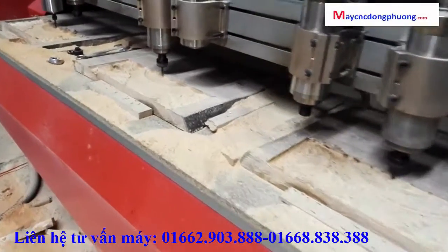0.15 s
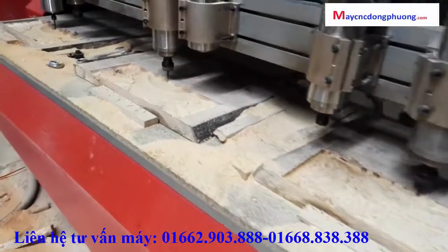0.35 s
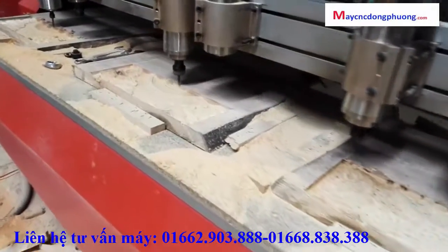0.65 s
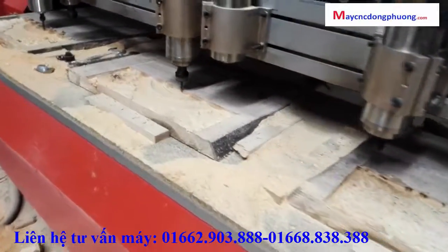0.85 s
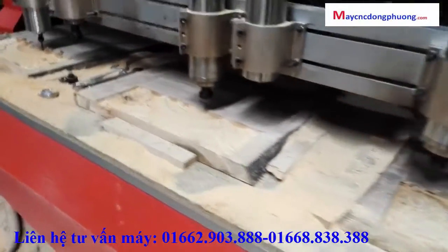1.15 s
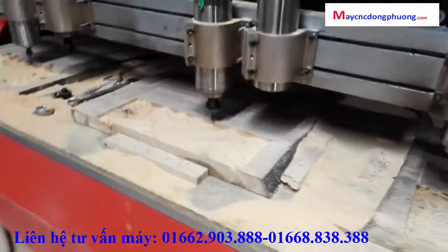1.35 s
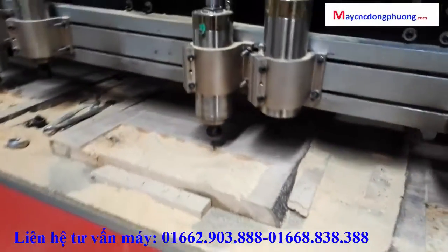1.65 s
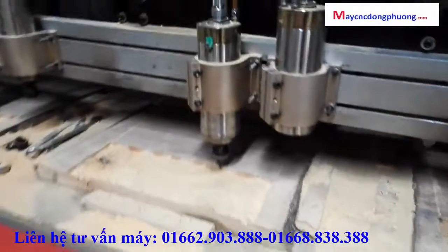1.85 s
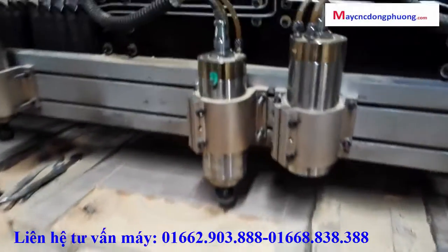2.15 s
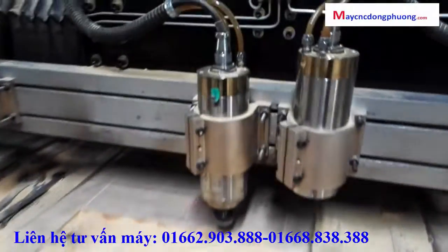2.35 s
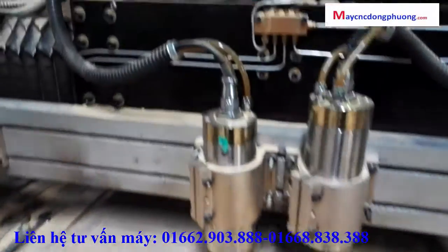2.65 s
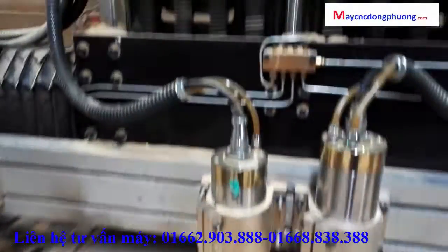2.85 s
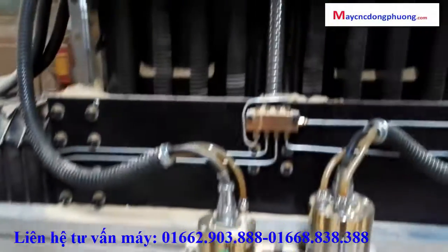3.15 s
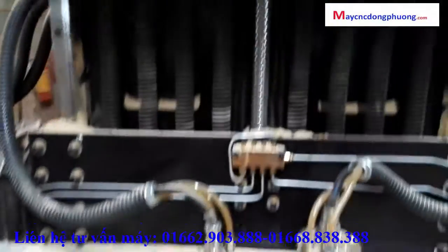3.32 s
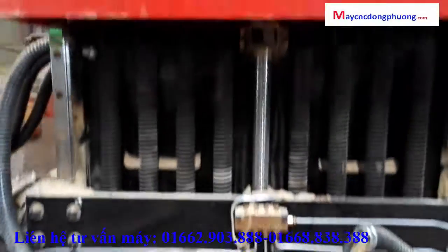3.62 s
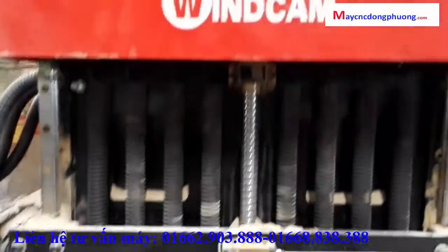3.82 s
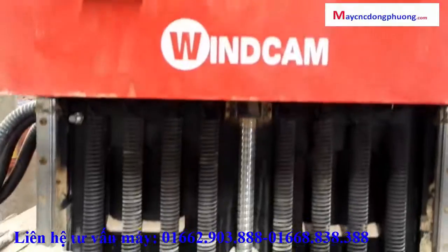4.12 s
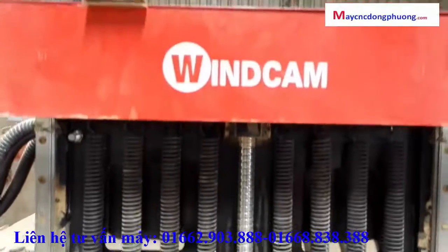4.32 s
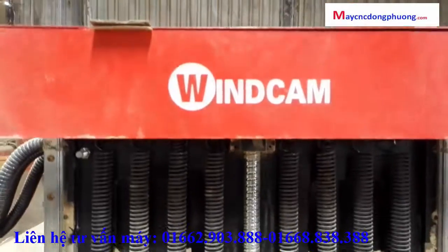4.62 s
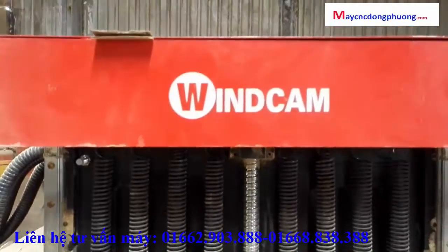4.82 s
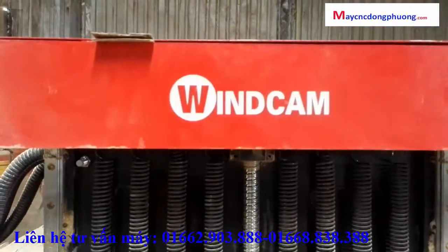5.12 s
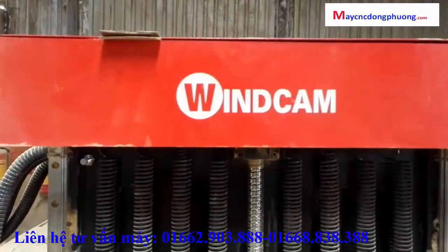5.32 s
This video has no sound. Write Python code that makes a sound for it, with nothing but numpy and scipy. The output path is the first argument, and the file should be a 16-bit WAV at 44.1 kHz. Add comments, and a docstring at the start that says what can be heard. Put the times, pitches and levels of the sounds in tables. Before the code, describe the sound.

A multi-spindle router is already cutting wood at 0 seconds, heard loud and close in a workshop, and runs throughout without stopping. Fast spindles give a hard, nearly steady whine with many buzzing overtones; a slower one hums about a whole tone below. The bits work in short strokes: each brings a swell of woody roar, dry rasp and hissing chips, and the pitch sags very slightly under load. After an early cut, it lightens around 0.3-0.75, bites harder at 0.8-1.25, then strongly at 1.4-2.05. Lighter cutting follows until about 2.9, while the microphone rises from bed to gantry from 2.2 to 2.9, slightly dulling the spray and changing the overtone balance. Another heavy stroke comes at 3.2-3.9, moderate ones from 3.9 to 4.7, and a firmer cut from 5.0 to the abrupt end near 5.5. Overtones ring out and shift sideways; thin high whistles and low frame rumble stay faint.

```python
"""In a workshop a multi-spindle CNC router carves wood, heard from close by as the listener rises from bed to gantry.
The bits cut in short strokes: load makes the spindles (near 24000 rpm) sag and buzz, and the wood rasp and spray chips.
The spindles are sums of sine orders that ring out at set times; the cut is coloured noise, combed by bounces.
A slower spindle hums about a whole tone below, the frame rumbles (noise) and thin whistles (sines) sit on top."""
import sys
import numpy as np
from scipy import signal
from scipy.fft import rfft, irfft, next_fast_len
from scipy.io import wavfile

SR = 44100
rng = np.random.default_rng(int(sys.argv[2]) if len(sys.argv) > 2 else 0)


def master(y):
    """Save y as 16-bit WAV."""
    cut = np.clip(np.atleast_2d(y).T, -1, 1)
    pcm = np.round(cut * 32767)  # scale
    wavfile.write(sys.argv[1], SR, pcm.astype(np.int16))


N = 241315


def from_db(db):
    """Decibels to gain."""
    return 10 ** (np.asarray(db) / 20)


def rms_one(x):
    """Scale to unit power."""
    return x / np.sqrt(np.mean(x ** 2) + 1e-20)


def in_time(rows):
    """Straight lines through (time, value) rows, a value for every sample."""
    time_s, value = np.transpose(rows)
    return np.interp(np.arange(N) / SR, time_s, value)


def drift(rate_hz):
    """Slow random curve of spread 1: white noise through a two-pole low-pass, drawn at every 40th sample."""
    step, warm_up = 40, 2000
    r = np.exp(-2 * np.pi * rate_hz * step / SR)
    white = rng.standard_normal(N // step + 2 + warm_up)
    slow = signal.lfilter([1], [1, -2 * r, r * r], white)[warm_up:]
    return np.interp(np.arange(N) / step, np.arange(len(slow)), rms_one(slow))


def pan(lean_db):
    """Left and right gains at constant power; positive leans left."""
    gains = from_db(np.array([[.5], [-.5]]) * lean_db)
    return gains / np.sqrt(np.mean(gains ** 2, axis=0))


def noise(spectrum, alike):
    """Stereo noise of a given colour and left-right correlation; rms 1."""
    size = next_fast_len(N)
    hz, level_db = np.transpose(spectrum)
    bins_hz = np.maximum(np.arange(size // 2 + 1) * SR / size, 1)
    gain = from_db(np.interp(np.log(bins_hz), np.log(hz), level_db, left=-60, right=-60))
    white = rng.standard_normal((2, size))
    mid, side = irfft(rfft(white) * gain, size)[:, :N]
    return rms_one(np.sqrt(1 + alike) * mid + np.sqrt(1 - alike) * side * [[1], [-1]])


def shaft_angle(hz, jitter_hz):
    """Angle in radians of a rotation whose speed trembles."""
    return 2 * np.pi * np.cumsum(hz + jitter_hz * drift(21.04)) / SR


def tone(angle, lead_rad, lean_db):
    """A sine partial of rms 1 that reaches the two ears with its own lead and lean."""
    ear_phase = np.array([[.5], [-.5]]) * lead_rad
    return np.sqrt(2) * pan(lean_db) * np.sin(angle + rng.uniform(0, 2 * np.pi) + ear_phase)


def scattered(angle, rate_hz):
    """A partial arriving by many changing paths: it fades and beats on its own in each ear; rms near 1."""
    sine, cosine = np.sin(angle), np.cos(angle)
    return np.array([drift(rate_hz) * sine + drift(rate_hz) * cosine for ear in range(2)])


def beating(depth):
    """Gain of a line that two spindles at nearly the same speed share; expected power 1."""
    phase = 2.94 * drift(3.17) + rng.uniform(0, 2 * np.pi)
    return np.sqrt(1 + 2 * depth / (1 + depth ** 2) * np.cos(phase))


def swell(start_s, length_s, attack_s, release_s, shallow):
    """Envelope that sets in, arches to its top midway and lets go; shallow is the share lost at the ends."""
    since_s = np.arange(N) / SR - start_s
    gate = np.clip(np.minimum(since_s / attack_s, 1 + (length_s - since_s) / release_s), 0, 1)
    return gate * (1 - shallow * np.clip(2 * since_s / length_s - 1, -1, 1) ** 2)


def follow(law, load_db, height):
    """Level in dB of a sound that follows the load and changes as the listener rises."""
    level_db, per_load, gantry_db = law
    return level_db + per_load * load_db + gantry_db * height


def cutting_load():
    """Load on the bits in dB: each stroke climbs from idle, deepest midway; hard and soft grain makes it waver."""
    # bit strokes through the wood: (start [s], length [s], load [dB re an average cut])
    strokes = [(-0.18, 0.5, 4), (0.288, 0.85, -4.5), (0.78, 0.48, 5), (1.377, 0.69, 6.5),
               (2.023, 0.37, -0.1), (2.27, 0.84, -3.5), (2.873, 0.33, 1.4), (3.163, 0.74, 6.5),
               (3.84, 0.28, 0.9), (4.096, 0.62, 0.9), (4.606, 0.12, -3.2), (4.742, 0.66, 0.06),
               (5.037, 0.47, 4)]
    idle_db, grain_db = -7.5, 0.42
    depths_db = [(db - idle_db) * swell(start_s, length_s, attack_s=.07, release_s=.027, shallow=.607)
                 for start_s, length_s, db in strokes]
    return idle_db + np.max(depths_db, axis=0) + grain_db * drift(9)


def shaft_hum(angle):
    """The fast shafts hum once a turn."""
    # fundamental of the fast spindles: (time [s], level [dB])
    hum = [(0.0, -28.5), (0.55, -33.5), (0.62, -46.5), (1.05, -31), (1.1, -39.5), (1.69, -20),
           (2.06, -28.5), (3.41, -27), (3.5, -41), (3.56, -29), (3.75, -21.5), (4.21, -38.5), (4.3, -29),
           (5.15, -30), (5.3, -46), (5.47, -28.5)]
    level_db = in_time(hum) + drift(17)
    return from_db(level_db) * tone(angle, 0.46 * drift(1.24), 1.2 * drift(5.1))


def with_rings(order, steady_db, lead_rad, lean_db):
    """Gain, lead and lean of one order: each ring of the bit adds power and pulls the line to its own place."""
    # rings: (start [s], length [s], order, level [dB], left leads [rad], left-right [dB])
    rings = [(0.0, 0.18, 4, -17.5, -2, -3), (0.045, 0.16, 3, -29, -2, -8),
             (0.462, 0.31, 2, -22, -2.0, -7.5), (0.585, 0.12, 3, -27, -2, 1.5),
             (0.785, 0.26, 5, -24.5, -2.5, -22), (0.837, 0.18, 2, -24, 1.03, -2),
             (1.065, 0.19, 2, -19.5, -0.4, 12), (1.09, 0.13, 4, -17.5, 3, 2.5),
             (1.526, 0.19, 2, -21, 0.7, 3), (1.588, 0.12, 3, -23.5, 1.4, -8), (1.75, 0.2, 2, -21.5, 0.5, 7),
             (1.8, 0.23, 4, -22, -0.4, -4), (1.824, 0.26, 5, -25, 1.8, 4), (2.113, 0.39, 4, -27, 1.9, 11),
             (2.156, 0.37, 2, -27, 1.1, 1), (2.172, 0.18, 5, -25, 1.8, -3), (2.52, 0.36, 3, -30, -1, 6),
             (2.94, 0.26, 3, -22, -0.9, 3), (2.948, 0.18, 2, -19, 0.8, -3), (3.213, 0.22, 3, -22, 0.4, -3),
             (3.217, 0.387, 2, -14.5, -0.6, -1), (3.5, 0.37, 3, -27.5, -0.5, -19),
             (3.651, 0.3, 2, -23, 0.1, 0), (3.888, 0.19, 2, -20, -0.5, -0.5),
             (3.963, 0.14, 5, -27, -3.5, -15), (4.198, 0.22, 3, -33, -0.5, -3),
             (4.325, 0.23, 2, -23.5, 1.03, 1.5), (4.426, 0.13, 5, -23, 2, -11),
             (4.788, 0.25, 2, -26.5, 0.8, -3), (4.81, 0.23, 3, -23.5, 0.0, -6),
             (5.003, 0.37, 3, -24.5, -0.2, -1), (5.226, 0.45, 2, -18.5, 0.5, -3)]
    power = from_db(steady_db) ** 2
    pull = power * np.exp(1j * lead_rad)
    leaning = power * lean_db
    for start_s, length_s, rung_order, db, ring_lead_rad, ring_lean_db in rings:
        if rung_order == order:
            envelope = swell(start_s, length_s, attack_s=.031, release_s=.024, shallow=.33)
            ring_power = (from_db(db) * envelope) ** 2
            power = power + ring_power
            pull = pull + ring_power * np.exp(1j * ring_lead_rad)
            leaning = leaning + ring_power * ring_lean_db
    return np.sqrt(power), np.unwrap(np.angle(pull)), leaning / power


def fast_whine(angle, load_db, height):
    """Orders two to five: clean lines that grow with the load, ring out at times and sway in the standing waves."""
    # (order, level at average load [dB], slope [dB per dB of load], gain at the gantry [dB],
    #  left leads [rad], wander of the lead [rad], left-right [dB], beat depth [0-1])
    whine = [(2, -33.5, .4, 5, -1, 0.33, -1, 0.22), (3, -30.5, 0.53, 2, 1.63, 0.69, -1.5, 0.51),
             (4, -26, 1, -2, 3, 0.53, 2.5, 0.53), (5, -32, 0.74, 3, 2.5, 1, -5, 0.58)]
    path_wander_rad = .45   # the listener's movement shifts each order's phase
    out = 0
    for order, *law, lead_rad, wander_rad, lean_db, depth in whine:
        steady_db = follow(law, load_db, height)
        gain, lead_rad, lean_db = with_rings(order, steady_db, lead_rad, lean_db)
        phase = order * angle + path_wander_rad * drift(2.3)
        partial = tone(phase, lead_rad + wander_rad * drift(2.37), lean_db + 3 * drift(8))
        out = out + gain * beating(depth) * from_db(0.65 * drift(18)) * partial
    return out


def edge_buzz(angle, load_db, height):
    """The edges strike the wood on every turn, a little unevenly; each order swells and fades on its own."""
    # (order, level at average load before the per-order slope [dB], gain at the gantry [dB])
    buzz = [(6, -37, 1), (7, -38, -4.5), (8, -39.5, -2), (9, -40.5, 4.5), (10, -39, 3.5), (11, -41.5, 0),
            (12, -41, -1), (13, -44.5, 2), (14, -47.5, 3), (15, -44.5, -5), (16, -46, 1), (17, -50.5, 8),
            (18, -50, -2), (19, -48.5, -2.5), (20, -49.5, -2)]
    tremble_rad = .028
    struck = angle + tremble_rad * drift(37)
    out = 0
    for order, db, gantry_db in buzz:
        per_load = 1 + 0.032 * order   # dB per dB of load: deep cuts buzz brighter
        level_db = follow((db, per_load, gantry_db), load_db, height)
        direct = tone(order * struck, 2.0 * drift(2.16), 3 * drift(19))
        arriving = from_db(2.0 * drift(4.9)) * (direct + 0.95 * scattered(order * struck, rate_hz=12))
        out = out + from_db(level_db) * rms_one(arriving)
    return out


def bounced(x, delay_s, sway, strength):
    """A bounce off the bed or gantry combs the noise; the comb slides as each ear moves. Power is about kept."""
    now = np.arange(N)
    lags = [delay_s * SR * np.exp(sway * drift(0.601)) for ear in x]
    echo = np.array([np.interp(now - lag, now, ear) for lag, ear in zip(lags, x)])
    return (x + strength * echo) / np.sqrt(1 + strength ** 2)


def cutting(angle, load_db, height):
    """The wood roars as fibres tear; rasp and chip spray come in bursts locked to the turning bit."""
    # noise colours: (frequency [Hz], relative density [dB per Hz])
    roar_colour = [(200, -11), (300, -12.5), (380, 4.5), (425, 9.5), (480, 1.5), (540, 6.5), (680, 4),
                   (800, 7.5), (930, 5), (1080, 4), (1350, 3), (1800, 5), (2050, 3.5), (2400, -7)]
    rasp_colour = [(1700, -28), (2250, -1.5), (2600, 11), (3000, 5), (3200, 11.5), (3400, 0), (3800, 8),
                   (4200, 9), (4650, 8.5), (5000, 2), (5900, 6.5), (6700, 3.5), (8000, 0), (12000, 0)]
    spray_colour = [(4000, -12), (6500, -7), (7500, 0.5), (8300, -1), (8800, 3), (10000, 1.5),
                    (11500, -0.5), (13000, 1), (14200, -2.5), (16000, 0)]
    # laws: (level at average load [dB], slope [dB per dB of load], gain at the gantry [dB])
    roar_law = (-29.5, 0.35, -0.1)
    rasp_law = (-29.5, 0.67, -0.47)
    spray_law = (-29, 0.67, -1.84)
    jolt_db = 0.5 * drift(22)   # tearing fibres jolt the whole cut
    roar_db = follow(roar_law, load_db, height) + jolt_db + drift(3.7)
    rasp_db = follow(rasp_law, load_db, height) + jolt_db + drift(29)
    spray_db = follow(spray_law, load_db, height) + jolt_db + 0.5 * drift(43)
    bursts = rms_one(1 + .13 * np.cos(angle) + .07 * np.cos(2 * angle) + .13 * np.sin(3 * angle))
    roar = from_db(roar_db) * noise(roar_colour, alike=.35)
    rasp = bursts * from_db(rasp_db) * noise(rasp_colour, alike=.017) * pan(-0.68)
    spray = bursts * from_db(spray_db) * noise(spray_colour, alike=.033)
    wood = bounced(roar + rasp, delay_s=.0011, sway=.25, strength=.4)
    return bounced(wood + spray, delay_s=.0035, sway=.12, strength=.4)


def slow_spindle(load_db):
    """A second shaft about a whole tone lower; its two lowest orders beat, the higher ones grow with the load."""
    # fundamental and octave: (time [s], level [dB])
    first_curve = [(0.0, -54), (0.15, -35), (1.52, -39), (1.98, -30), (2.8, -45.5), (3.44, -39),
                   (4.22, -53), (4.28, -44), (5.47, -39)]
    second_curve = [(0.0, -41), (0.06, -26), (0.47, -48), (0.72, -32.5), (1.45, -31), (1.55, -41),
                    (1.68, -31.5), (2.04, -35.5), (2.27, -24.5), (2.56, -30), (2.71, -45), (3.78, -40),
                    (4.4, -45), (5.47, -42)]
    # higher orders: (order, level at average load [dB])
    higher_orders = [(3, -44), (4, -46), (5, -40.5), (6, -49), (7, -46), (10, -46)]
    angle = shaft_angle(349.1, jitter_hz=.422)
    first = tone(angle, 0.31 * drift(3.4), 1.5 * drift(2.2))
    first = from_db(in_time(first_curve)) * beating(.24) * first
    second = tone(2 * angle, 0.38 * drift(4.5), 3 * drift(1.8))
    second = from_db(in_time(second_curve) + 0.59 * drift(15)) * beating(.43) * second
    higher = sum(from_db(db) * scattered(order * angle, rate_hz=4.1) for order, db in higher_orders)
    return first + second + from_db(0.26 * load_db) * higher


def whistles():
    """Thin lasting sines, likely from the drives and bearings, wavering a little in pitch and level."""
    # (frequency [Hz], mean level [dB])
    whistle_lines = [(6390, -45), (12595, -46), (12370, -54), (12775, -54)]
    out = 0
    for hz, db in whistle_lines:
        line = tone(shaft_angle(hz, jitter_hz=4.46), 2.0 * drift(3.8), 3 * drift(3.3))
        out = out + from_db(db + 2 * drift(7)) * line
    return out


def frame_rumble():
    """The frame rumbles: low coloured noise, much alike in both ears."""
    # (frequency [Hz], relative density [dB per Hz])
    frame_colour = [(20, -17), (35, -16), (55, -4), (68, -15), (86, 1), (105, -5), (135, -5), (180, -7),
                    (260, -9.5), (400, -1), (900, -24)]
    return from_db(-41) * noise(frame_colour, alike=.76)


def scene():
    """The strokes load the spindles and drive the cut; the frame rumbles underneath."""
    spindle_hz, sag_hz_per_db = 399.1, .06
    rise_start_s, rise_s = 2.2, .69
    load_db = cutting_load()
    height = np.clip((np.arange(N) / SR - rise_start_s) / rise_s, 0, 1)   # 0 bed, 1 gantry
    angle = shaft_angle(spindle_hz - sag_hz_per_db * load_db, jitter_hz=.55)
    fast = shaft_hum(angle) + fast_whine(angle, load_db, height) + edge_buzz(angle, load_db, height)
    cut = cutting(angle, load_db, height)
    return fast + cut + slow_spindle(load_db) + whistles() + frame_rumble()


def record(dry):
    """The left port is brighter than the right; the highest peaks are rounded and the top is cut steeply."""
    ceiling, cutoff_hz = .95, 14300
    top = signal.sosfiltfilt(signal.butter(3, 10500, "high", fs=SR, output="sos"), dry)
    coloured = dry + (pan(4.1) - 1) * top
    rounded = coloured / (1 + (coloured / ceiling) ** 8) ** (1 / 8)
    return signal.sosfilt(signal.ellip(10, .1, 80, cutoff_hz, fs=SR, output="sos"), rounded)


dry = scene()
out = record(dry)
master(out)
```